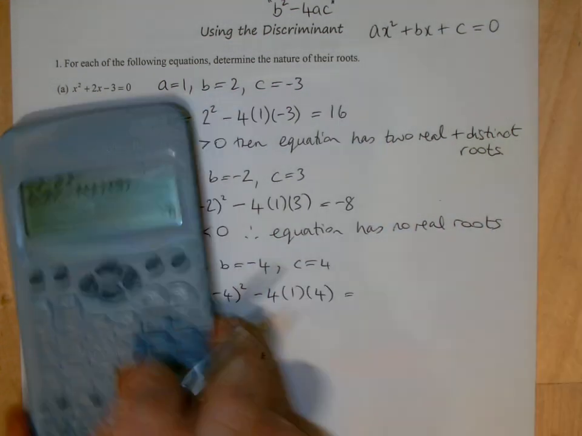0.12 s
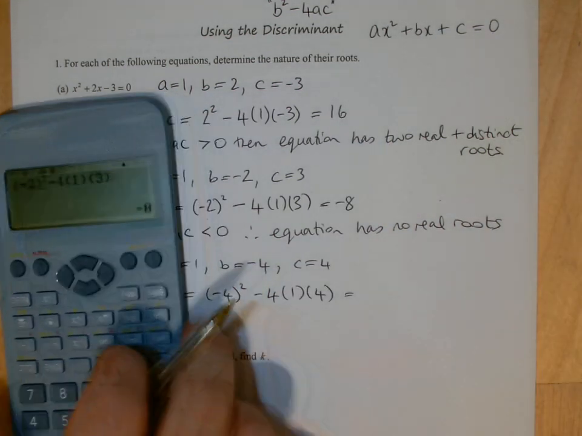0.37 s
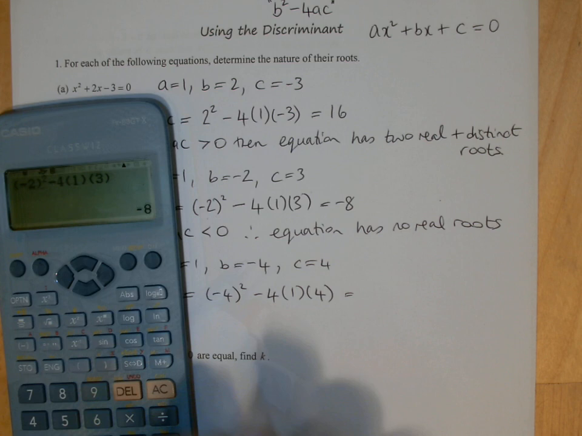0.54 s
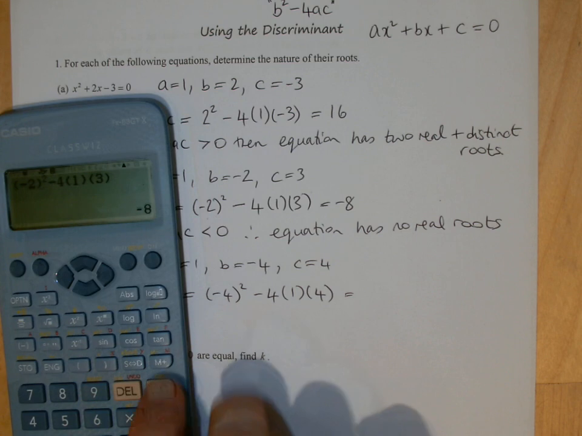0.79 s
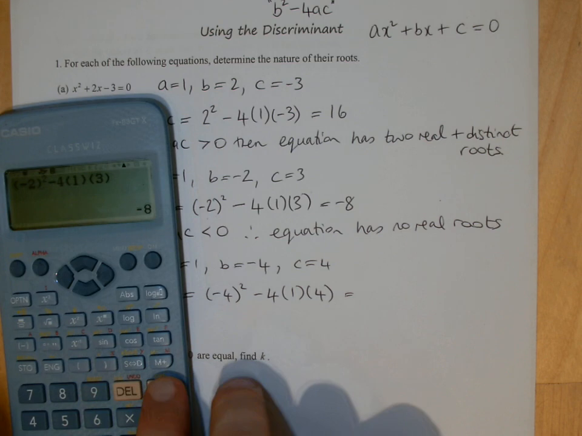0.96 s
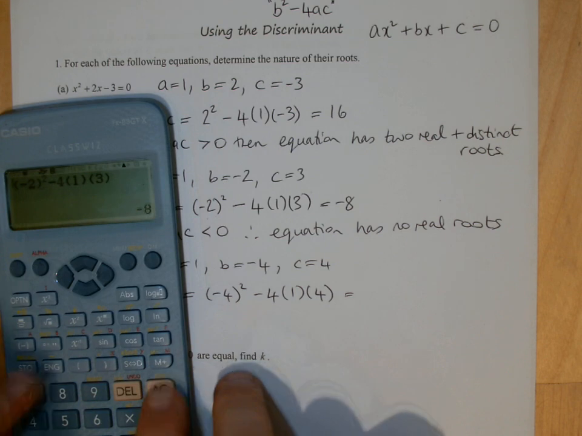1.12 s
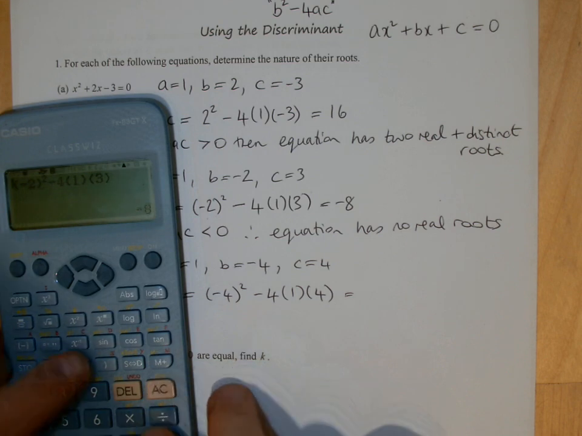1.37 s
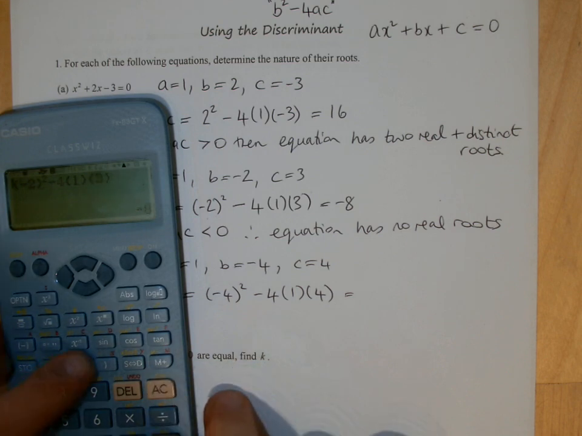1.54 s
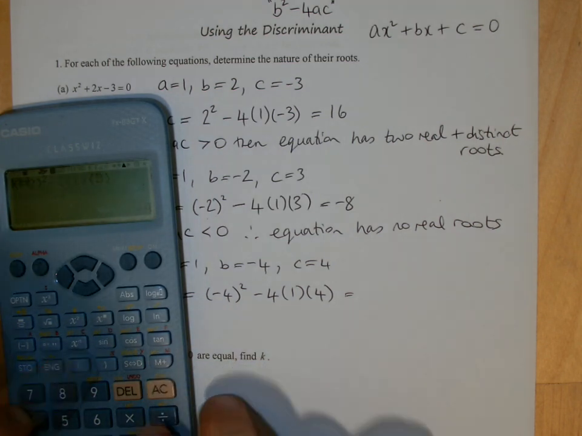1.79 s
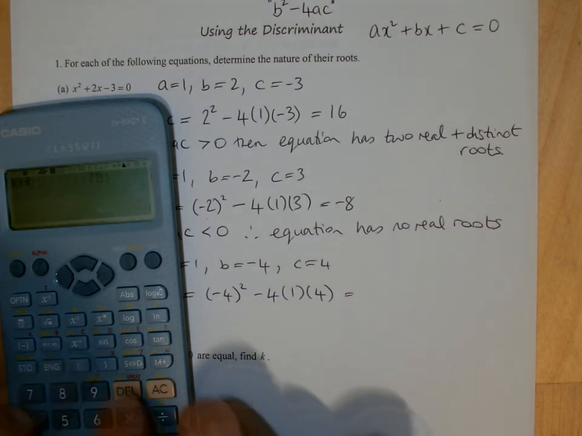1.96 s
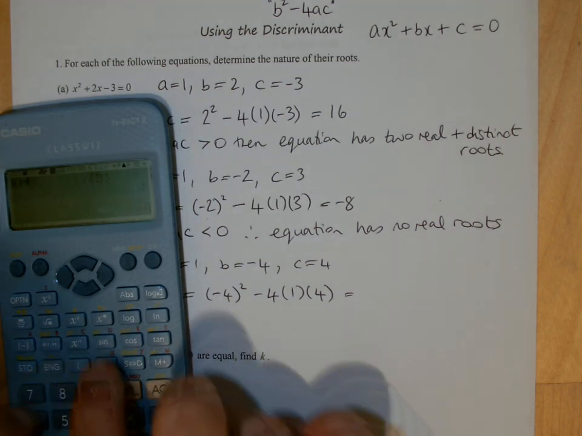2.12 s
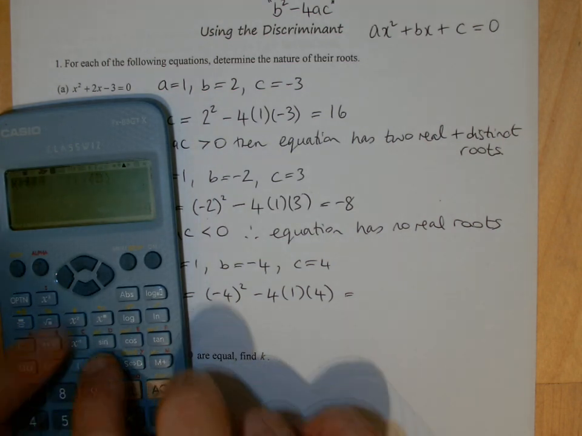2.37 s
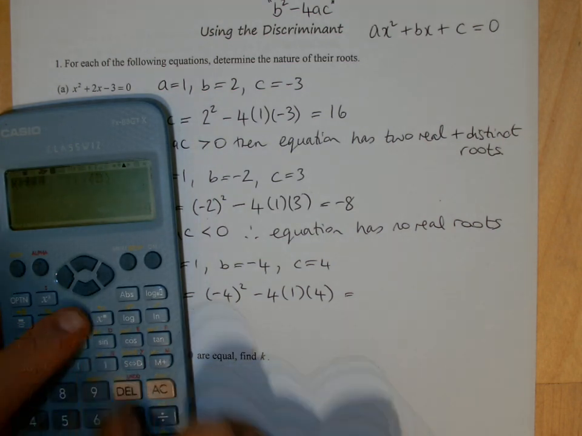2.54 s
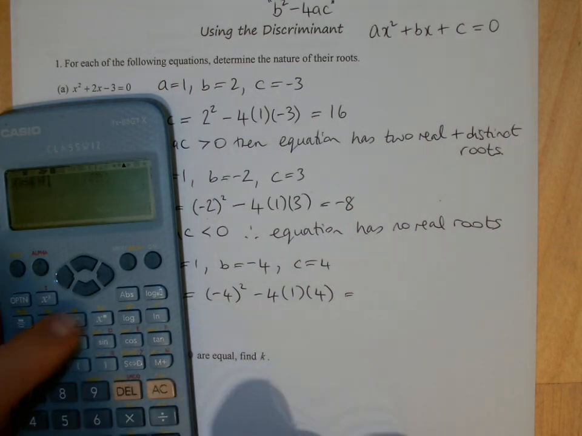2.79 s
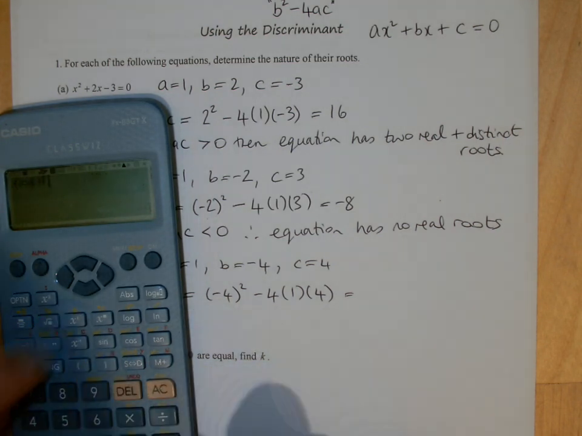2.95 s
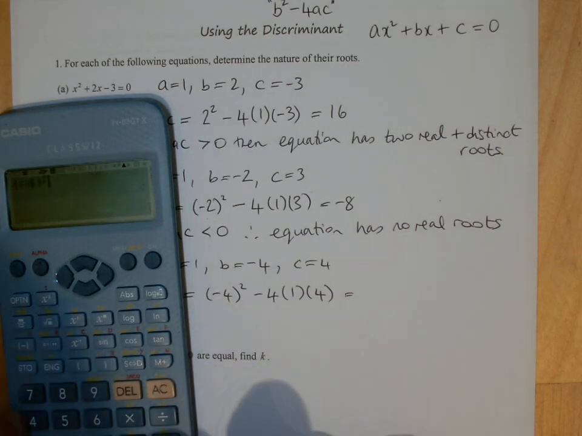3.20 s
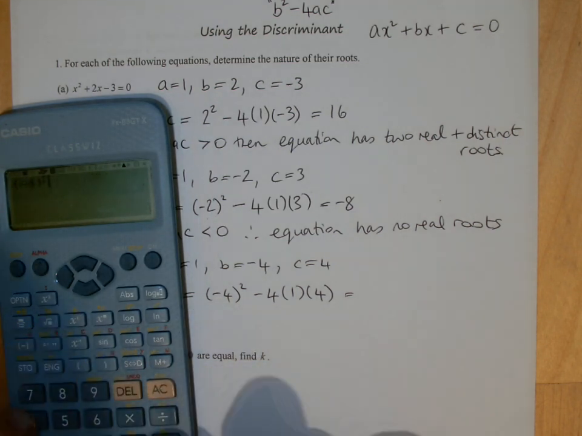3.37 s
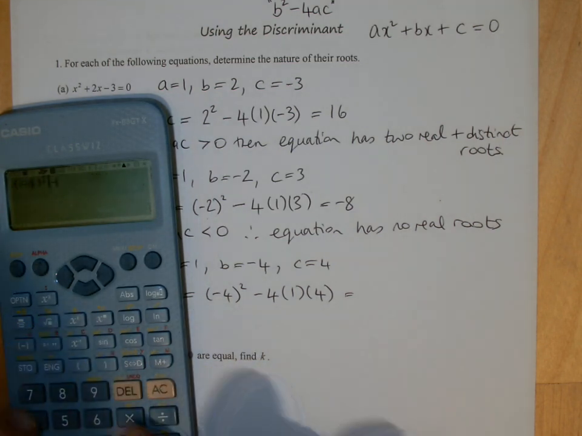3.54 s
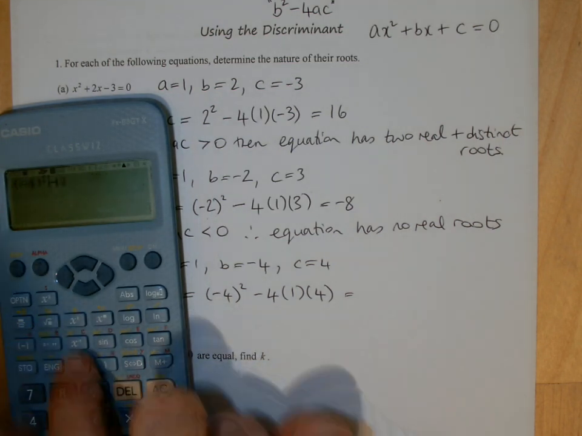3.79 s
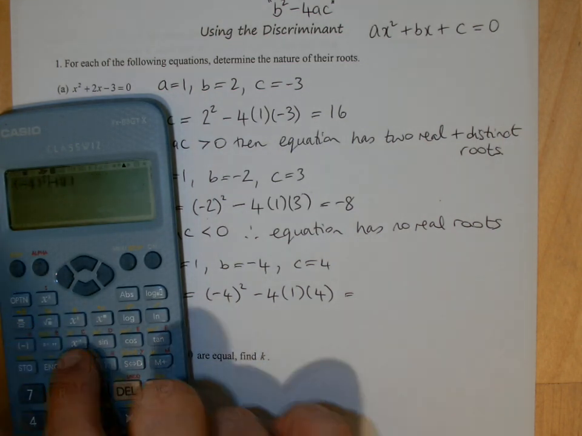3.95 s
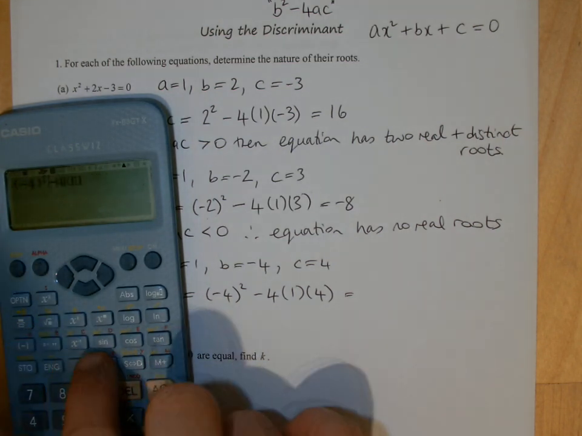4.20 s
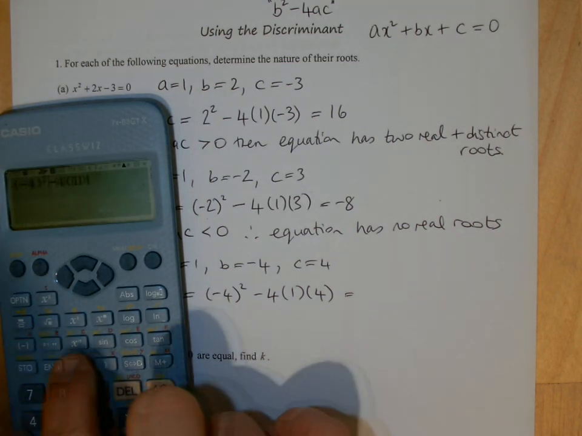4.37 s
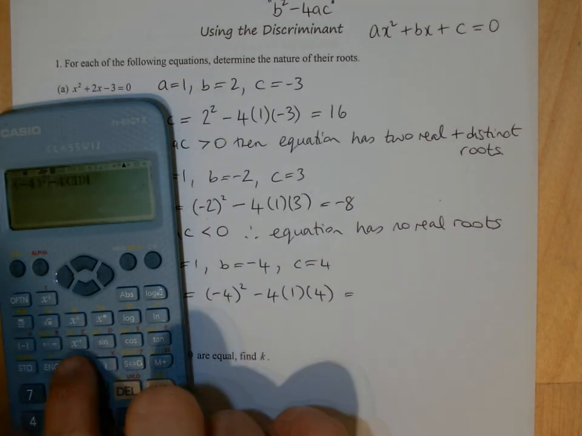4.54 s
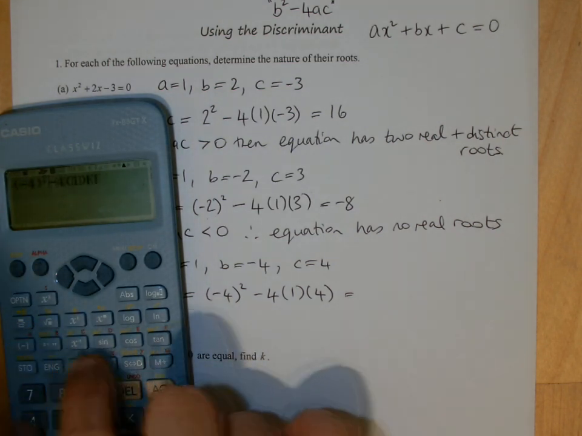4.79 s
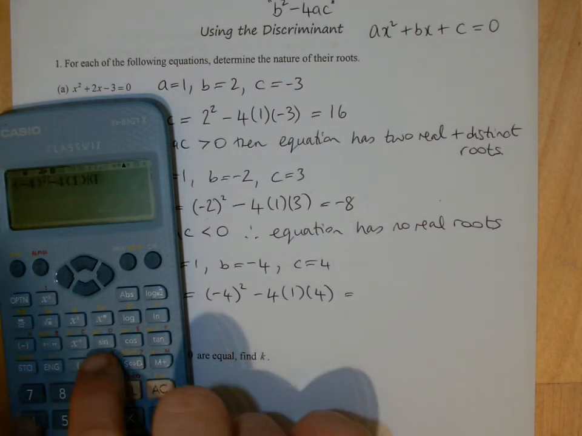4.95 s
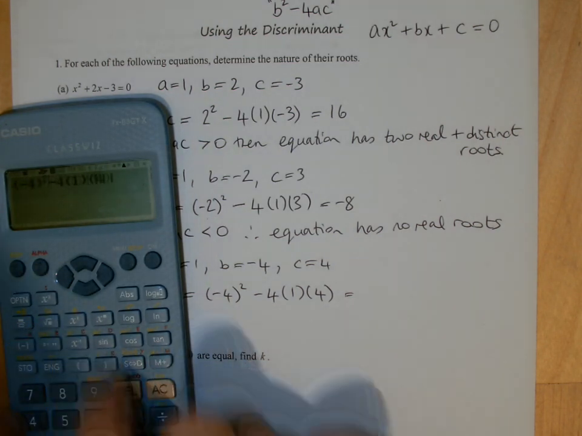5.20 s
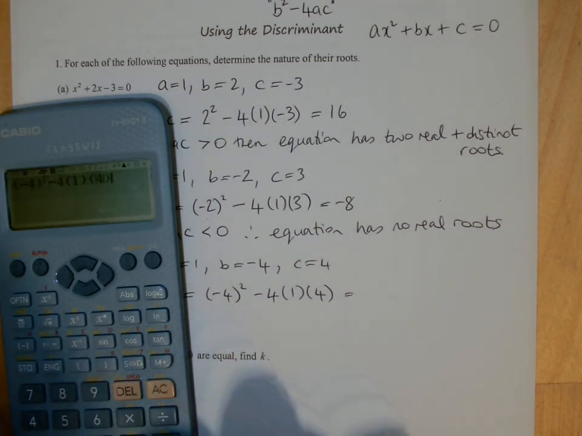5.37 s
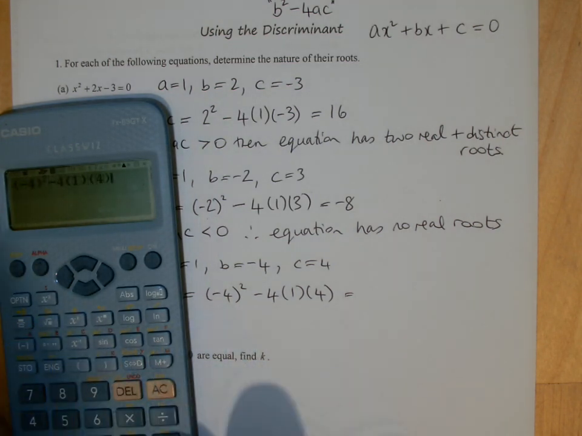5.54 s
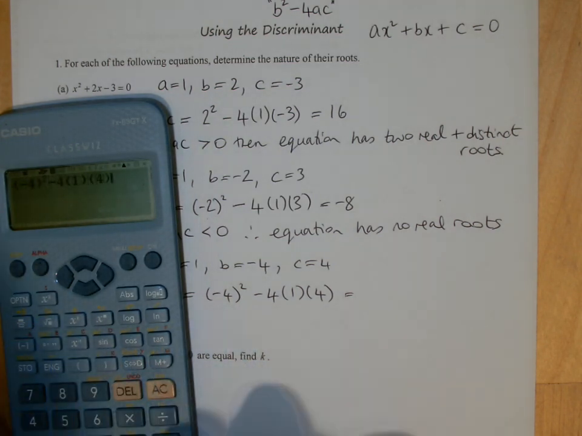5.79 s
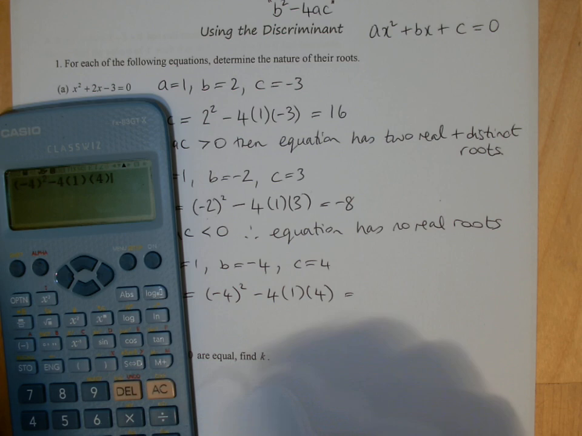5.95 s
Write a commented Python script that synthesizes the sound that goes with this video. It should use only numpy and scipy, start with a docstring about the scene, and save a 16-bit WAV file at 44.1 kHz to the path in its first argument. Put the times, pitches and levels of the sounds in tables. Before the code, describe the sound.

A light plastic calculator is set on a papered wooden desk: a sharp, hard clack, a brief rattle and rustle, then a duller second knock as the other end drops. After a little shuffling, fingers press rubber keys at an uneven pace, each a soft muffled thump with small dry ticks. Close microphone above the desk, small quiet room, short echo, constant low rumble and faint hiss.

```python
"""Calculator on a desk

A plastic calculator lands on a paper-covered wooden desk, one end and then the other, in a small quiet room.
Fingers then work its rubber keys: pushes and knocks are short forces that ring the desk like a set of bells.
Key ticks, landing cracks and loose parts are dying bursts of coloured noise; dragging on paper is uneven noise.
A noise tail adds the room. Low rumble and hiss (shaped noise) and three thin sine whines lie underneath.
"""
import sys
import numpy as np
from scipy import signal
from scipy.fft import rfft, irfft
from scipy.io import wavfile
from scipy.ndimage import uniform_filter1d

SR = 44100
rng = np.random.default_rng(int(sys.argv[2]) if len(sys.argv) > 2 else 0)


def store_wav(level_fs):
    """Save 16-bit WAV to argv[1]."""
    pcm = np.round(np.clip(np.atleast_2d(level_fs), -1, 1) * 32767)
    wavfile.write(sys.argv[1], SR, pcm.T.astype(np.int16))


def amplitude_ratio(level_db):
    """Convert a level in decibels to the matching linear amplitude (field) ratio."""
    exponent = np.asarray(level_db, float) / 20
    return 10 ** exponent


N = 265923  # length in samples

# All levels of spectra and forces are relative, unless marked rms.
# room rumble and microphone hiss: f/Hz, level per Hz/dB
AIR_COLOUR = [(15, -9.5), (25, 1), (60, -6.5), (130, -11.5), (250, -15), (500, -26), (650, -25.5),
              (1400, -34), (3000, -34), (6000, -35), (9800, -36), (12600, -36.5), (16000, -37.5)]
# humps on the rumble and hiss: f/Hz, width/Hz, height/dB
AIR_HUMPS = [(61, 34, 4), (248, 28, 4), (433, 26, 1), (505, 26, 3.5), (7300, 1500, -0.5), (10360, 160, 4),
             (11140, 480, 8), (11480, 500, 7), (12630, 250, 4.5)]
# thin steady electronic tones: f/Hz, rms level/dB
WHINES = [(7989, -88), (12129, -93), (13771, -85)]
# how the room's echoes die: f/Hz, time to fall 60 dB/s, level/dB
ROOM_ECHOES = [(99, 0.69, -13), (500, 0.41, -14), (1430, 0.36, -4.5), (4130, 0.4, -7), (9000, .25, -11)]
# hands shifting the case on paper: t/s, rasp level/dB (rms, before its unevenness)
RUSTLE = [(0, -57.5), (.08, -65), (.15, -55.5), (.54, -65), (.7, -67.5), (.8, -66.5), (.9, -63), (.98, -61),
          (1.1, -68), (1.5, -65.5), (1.8, -70.5), (2.2, -65.5), (2.45, -70), (3.9, -67.5), (4.65, -69),
          (5.0, -67.5), (5.3, -70.5), (6.03, -67.5)]
# colour of the dry rasp: f/Hz, level per Hz/dB
RASP_COLOUR = [(400, 6.5), (900, 3.5), (1500, 0), (2500, -3), (5000, -9.5), (9000, -13.5)]
# colour of the rough dragging force: f/Hz, level per Hz/dB
DRAG_COLOUR = [(150, -25.5), (300, -8.0), (430, -6.0), (520, -8.0), (800, -3.0), (1500, -20.5), (5000, -9.0)]
# humps of the plastic shell: f/Hz, width/Hz, height/dB
SHELL_HUMPS = [(888, 140, 5), (1155, 34, 8), (1500, 113, 2.5), (1960, 270, 2), (2470, 370, 3.5),
               (3740, 620, 4), (5240, 460, -0.5), (7630, 530, 1.5)]
# basic colour of cracks, rattles and ticks: f/Hz, level per Hz/dB
CRACK_COLOUR = [(150, -1), (700, 4), (1500, -0.5), (2500, 0.5), (4000, -2), (6000, -2), (9000, -6),
                (12000, -1), (16000, -40)]
# ringing modes of the desk with the case on it: f/Hz, longest time to fall 60 dB/s,
# level struck at the far end/dB, level at the near end/dB, level under the keys/dB
DESK_MODES = [(88.6, 0.21, -29, -9.5, -13), (115.6, 0.32, -33, -17.5, -22), (169.4, 0.17, -8.5, -18.5, 11),
              (253.2, 0.12, -10.5, -9.5, -5), (310, 0.16, -11.5, -20, -2), (333.8, 0.14, -12.5, -12, -2.5),
              (380, 0.078, -11.5, -18, -1), (415, 0.11, -9, -11.5, 3), (455, 0.03, 0, -22, 6.5),
              (516.4, 0.17, -5, -5.5, 0), (564.7, 0.074, -5, -12, -6.5), (653, 0.15, -15.5, -30, -39),
              (753, 0.082, -10, -14, -9), (870, 0.091, -45, -5, -13), (958, 0.024, -6, -12, -3.5),
              (1114, 0.18, -11, -14, -2.5), (1290, 0.054, -28, -17, -2.5), (1496, 0.15, -26, -15, -11),
              (1916, 0.012, 0.5, -15, 2), (2240, 0.031, -34, -7, 4), (2270, .05, -3, -28, 0),
              (3230, 0.044, -18, -35, -19), (3970, 0.079, -44, -24, -15), (4350, 0.021, -31, -37, -28),
              (5370, .03, -35, -12, -24)]
# contacts of the case as it lands: t/s, blow level/dB, contact time/ms, rocking f/Hz, share at the near end/0-1
LANDING = [(0.1427, -13, 0.5, 7, 0.28), (0.1451, -24.5, 0.39, -2, 0), (.147, -15, 6.8, 443, 0.25),
           (0.15, -19, 9.6, 265, 0), (.15, -26, 9.2, 106, 0.1), (0.3824, -17, 1.96, 864, 0.94),
           (.386, -16.5, 12, 155, 0.34), (.3866, -23, 0.23, 0, 0.84), (.391, -15, 5, 444, 0.6),
           (.397, -24, 1.36, 0, 0.6), (0.42, -24, 5, 87, 0.7)]
# the shell cracks against the desk: t/s, level/dB
LANDING_CRACKS = [(0.1235, -57), (0.1424, -23), (0.1445, -51), (.373, -45), (.3835, -35.5), (.3862, -28),
                  (.3965, -35.5)]
# loose parts rattle on after each landing: t/s, level/dB
RATTLES = [(.15, -43.5), (0.389, -47.5)]
# a finger bottoms a key: t/s, force level/dB
PUSHES = [(0.868, -44.5), (1.454, -40), (1.572, -53), (1.625, -53.5), (2.063, -47.5), (2.234, -41.5),
          (2.361, -50), (2.595, -43.5), (3.073, -51.5), (3.616, -47), (3.632, -48), (3.84, -40),
          (3.961, -56), (4.181, -44), (4.585, -45.5), (4.727, -54), (4.896, -63), (5.055, -43.5),
          (5.168, -49)]
# the case rocks briefly on its rubber feet: t/s, force level/dB, rocking f/Hz
KNOCKS = [(0.815, -51.5, 420), (0.875, -50, 510), (1.051, -51, 500), (1.379, -50, 505), (1.456, -49, 523),
          (1.578, -50, 457), (1.725, -48.5, 500), (2.047, -47.5, 522), (2.07, -52, 377), (2.175, -53, 523),
          (2.197, -46.5, 500), (2.267, -44.5, 306), (2.356, -48.5, 415), (2.733, -49.5, 431),
          (3.057, -48, 416), (3.196, -48.5, 380), (3.262, -49.5, 437), (3.289, -52, 510),
          (3.428, -48.5, 384), (3.611, -48.5, 380), (3.705, -51.5, 416), (3.841, -42.5, 360),
          (3.949, -47, 515), (3.972, -50.5, 516), (4.132, -56, 527), (4.184, -51.5, 444),
          (4.303, -48.5, 400), (4.564, -53, 530), (4.722, -47, 550), (4.737, -48.5, 282), (4.893, -51, 323),
          (5.004, -43, 578), (5.059, -50.5, 415), (5.164, -47, 490), (5.189, -51, 283), (5.479, -51, 423),
          (5.517, -52.5, 520), (5.712, -53.5, 373)]
# a key slips or springs back: t/s, level/dB, ring f/Hz, height of that ring/dB
TICKS = [(0.814, -48.5, 2350, 11), (1.018, -45.5, 2700, 9), (1.04, -44, 2470, 3), (1.345, -48.5, 2670, 7),
         (1.45, -51.5, 3790, 2), (1.569, -43, 1590, -1), (1.727, -53.5, 2330, 3), (1.759, -51, 2390, 3),
         (2.168, -51, 1980, 6), (2.366, -46, 1980, 4), (2.721, -46.5, 900, 9), (2.724, -48, 2750, 5),
         (2.735, -43.5, 4520, 11), (3.05, -49.5, 4030, 15), (3.057, -45.5, 2540, 15),
         (3.061, -49, 5030, 17), (3.066, -50, 2300, 12), (3.068, -50, 1180, 14), (3.185, -48, 4100, 8.5),
         (3.272, -52, 2570, 12), (3.384, -51, 2640, 9), (3.712, -54.5, 2790, 12), (3.844, -50, 900, 14),
         (3.956, -48, 2840, 7), (3.968, -50, 2060, 10), (4.121, -48, 2570, 13), (4.238, -53.5, 4780, 29),
         (4.279, -48.5, 2420, 17), (4.297, -45.5, 2280, 3), (4.716, -51.5, 2550, 7), (4.721, -48, 940, 20),
         (4.797, -57, 2580, 12), (5.001, -46.5, 2800, 14), (5.159, -49, 1610, 6), (5.164, -40, 1820, 2),
         (5.474, -52, 1510, 1)]

AIR_DB = -54.5  # rms of rumble and hiss together
LUMPS_DB = 1.8  # rms swing of the rustle's unevenness
DRAG_DB, DRAG_FOLLOWS = -97, 0.9  # mean force level on the desk; share of the rasp's swing that it follows
RADIATES_ABOVE_HZ = 76
DAMPING = 68000  # longest ring of a mode in s, times its pitch in Hz squared
RING_WIDTH = 0.13  # share of the ring's pitch
CRACK_FLAT_BELOW_HZ = 700  # the tilt of a crack stops here
LANDING_RING_HZ, LANDING_RING_DB = 3700, 2.5
LANDING_CRACK_T60_S, LANDING_DB_PER_OCTAVE = 0.021, -2
RATTLE_T60_S, RATTLE_DB_PER_OCTAVE = 0.17, -3.5
PUSH_LEAD_MS = 4.28  # the finger's force starts this long before a push's time
BOUNCE_HZ, BOUNCE_MS = 164.2, 13.4  # the case bounces on its feet under a push
SHOVE_MS, SHOVE_DB = 5.05, -8  # and gets one blunt shove, with this much less gain
KNOCK_MS, KNOCK_LEAD_MS = 8.25, 7.99  # a knock's length; it starts this long before its time
TICK_T60_S, TICK_DB_PER_OCTAVE = 0.023, -4
TOP_HZ = 15720  # upper limit of the sound


def rms_one(x):
    """Scale a sound to an average strength (rms) of 1."""
    return x / np.sqrt(np.mean(x ** 2) + 1e-20)


def at_hz(points, hz, column=1):
    """Read a table between its points, on a log-frequency axis."""
    points = np.array(points)
    return np.interp(np.log(hz), np.log(points[:, 0]), points[:, column])


def humps(peaks, hz):
    """Add up bell-shaped rises, in dB."""
    return sum(db / (1 + (2 * (hz - top_hz) / width) ** 2) for top_hz, width, db in peaks)


def coloured(n, db_of_hz):
    """Shape white noise to the given dB per Hz, then scale it to rms 1."""
    hz = np.maximum(np.fft.rfftfreq(n, 1 / SR), 1)
    spectrum = rfft(rng.standard_normal(n)) * amplitude_ratio(db_of_hz(hz))
    return rms_one(irfft(spectrum, n))


def air():
    """Steady rumble and hiss are noise with a few humps; the thin whines are sine waves."""
    t = np.arange(N) / SR
    whines = sum(amplitude_ratio(db) * np.sqrt(2) * np.sin(2 * np.pi * hz * t) for hz, db in WHINES)
    hiss = coloured(N, lambda hz: at_hz(AIR_COLOUR, hz) + humps(AIR_HUMPS, hz))
    return amplitude_ratio(AIR_DB) * hiss + whines


def room(x):
    """Scattered reflections: octave bands of noise that swell in a few ms and die at their own rate."""
    t, tail = np.arange(SR) / SR, 0
    for low in 45 * 2. ** np.arange(9):
        high, middle = min(2 * low, .45 * SR), low * np.sqrt(2)
        band_filter = signal.butter(2, [low, high], "band", fs=SR, output="sos")
        band = signal.sosfilt(band_filter, rng.standard_normal(SR))
        fade = amplitude_ratio(-60 * t / at_hz(ROOM_ECHOES, middle))
        level = amplitude_ratio(at_hz(ROOM_ECHOES, middle, column=2))
        tail = tail + band * fade / np.sqrt(np.sum(fade ** 2)) * level
    swell = np.clip((t - .003) / 0.0029, 0, 1)  # silent for 3 ms, then rises
    return signal.fftconvolve(x, tail * swell)[:N]


def rustle():
    """Uneven friction: a rough force that shakes the desk, and a dry rasp heard through the shell."""
    rasp_db = np.interp(np.arange(N) / SR, *np.transpose(RUSTLE))
    slow_noise = uniform_filter1d(uniform_filter1d(rng.standard_normal(N), size=700), size=700)
    lumps_db = LUMPS_DB * rms_one(slow_noise)
    drag = coloured(N, lambda hz: at_hz(DRAG_COLOUR, hz))
    rasp = coloured(N, lambda hz: at_hz(RASP_COLOUR, hz) + humps(SHELL_HUMPS, hz))
    drag_db = DRAG_DB + DRAG_FOLLOWS * (rasp_db - rasp_db.mean())
    return drag * amplitude_ratio(drag_db + lumps_db), rasp * amplitude_ratio(rasp_db + lumps_db)


def forces(times, gains, contact_ms, rocking_hz=0):
    """Smooth force bumps; a rocking contact pushes and pulls in turn, so it favours modes near its rate."""
    out = np.zeros(N + SR)
    for s, gain, ms, hz in np.broadcast(times, gains, contact_ms, rocking_hz):
        t = (np.arange(SR // 25) - (s * SR) % 1) / SR  # starts between samples if need be
        u = t / (ms / 1000)  # 0 to 1 during contact
        bump = np.where((u > 0) & (u < 1), np.sin(np.pi * u) ** 2, 0)
        rocking = np.cos(2 * np.pi * hz * t)
        start = int(s * SR)
        out[start:start + len(u)] += gain * bump / np.sum(bump ** 2) * rocking
    return out[:N]


def desk(far, near, keys):
    """Every force rings the same modes, with strengths set by where it acts; neighbours swing in opposite sense."""
    out = np.zeros(N)
    for hz, t60, far_db, near_db, keys_db in DESK_MODES:
        # wood and plastic damp the high modes fast: the longest ring falls with the square of pitch
        r = amplitude_ratio(-60 / (min(t60, DAMPING / hz / hz) * SR))
        w = 2 * np.pi * hz / SR
        force = amplitude_ratio(far_db) * far + amplitude_ratio(near_db) * near + amplitude_ratio(keys_db) * keys + 1e-18
        out = signal.lfilter([0, np.sin(w)], [1, -2 * r * np.cos(w), r * r], force) - out
    # a small board moves air poorly in the deep bass
    return signal.sosfilt(signal.butter(4, RADIATES_ABOVE_HZ, "high", fs=SR, output="sos"), out)


def cracks(times, level_db, ring_hz, ring_db, tilt_db, t60):
    """Short dying bursts of plastic rattle, coloured by the shell and by the part that rings most."""
    out, n = np.zeros(N + SR), 4096
    t = np.arange(n) / SR
    fade = amplitude_ratio(-60 * t / t60) * np.clip(t / 0.00076, 0, 1)
    for s, db, top_hz, top_db in np.broadcast(times, level_db, ring_hz, ring_db):
        peaks = SHELL_HUMPS + [(top_hz, RING_WIDTH * top_hz, top_db)]

        def colour(hz):
            octaves = np.log2(np.maximum(hz, CRACK_FLAT_BELOW_HZ) / 2500)
            return at_hz(CRACK_COLOUR, hz) + humps(peaks, hz) + tilt_db * octaves

        start = int(s * SR)
        out[start:start + n] += amplitude_ratio(db) * coloured(n, colour) * fade
    return out[:N]


def landing_forces():
    """Each contact shares its blow between the far and the near end of the case."""
    s, blow_db, ms, hz, near = np.transpose(LANDING)
    far_force = forces(s, -amplitude_ratio(blow_db) * (1 - near), ms, hz)
    near_force = forces(s, -amplitude_ratio(blow_db) * near, ms, hz)
    return far_force, near_force


def landing_cracks():
    """The shell's sharp cracks die at once; loose parts rattle on for longer."""
    s, db = np.transpose(LANDING_CRACKS)
    shell = cracks(s, db, LANDING_RING_HZ, LANDING_RING_DB, LANDING_DB_PER_OCTAVE, LANDING_CRACK_T60_S)
    s, db = np.transpose(RATTLES)
    loose = cracks(s, db, LANDING_RING_HZ, LANDING_RING_DB, RATTLE_DB_PER_OCTAVE, RATTLE_T60_S)
    return shell + loose


def push_forces():
    """A finger bottoms a key: the case bounces on its feet and gets one blunt shove."""
    s, db = np.transpose(PUSHES)
    s = s - PUSH_LEAD_MS / 1000
    bounce = forces(s, -amplitude_ratio(db), BOUNCE_MS, BOUNCE_HZ)
    return bounce + forces(s, -amplitude_ratio(db + SHOVE_DB), SHOVE_MS)


def knock_forces():
    """The case rocks briefly on its rubber feet, pushing and pulling at the desk."""
    s, db, hz = np.transpose(KNOCKS)
    return forces(s - KNOCK_LEAD_MS / 1000, -amplitude_ratio(db), KNOCK_MS, hz)


def key_ticks():
    """A key slips or springs back with a short burst that has its own ring."""
    s, db, ring_hz, ring_db = np.transpose(TICKS)
    return cracks(s, db, ring_hz, ring_db, TICK_DB_PER_OCTAVE, TICK_T60_S)


def calculator():
    """All forces go through one desk; cracks, ticks and rasp are heard straight from the shell."""
    far_force, near_force = landing_forces()
    drag_force, rasp = rustle()
    keys_force = push_forces() + knock_forces() + drag_force
    return desk(far_force, near_force, keys_force) + landing_cracks() + key_ticks() + rasp


def scene():
    """One microphone above the desk hears the calculator, its echoes and the air."""
    hits = calculator()
    return (hits + room(hits) + air())[None]


def roll_off(x):
    """The treble ends steeply here."""
    return signal.sosfilt(signal.butter(12, 16300, fs=SR, output="sos"), x)


def record(dry):
    """A steep filter cuts off the very top of the sound."""
    steep = signal.ellip(10, .5, 60, TOP_HZ, fs=SR, output="sos")
    mix = signal.sosfilt(steep, dry)
    return roll_off(mix)


dry = scene()
out = record(dry)
store_wav(out)
```